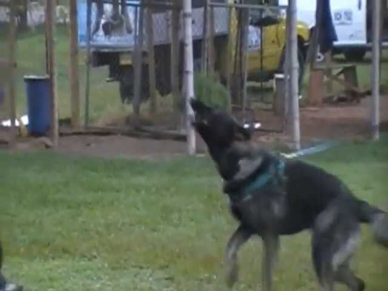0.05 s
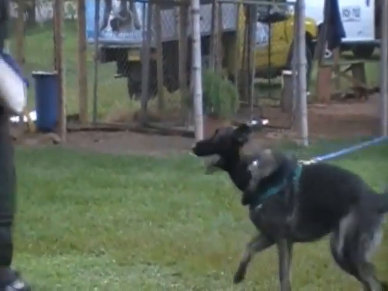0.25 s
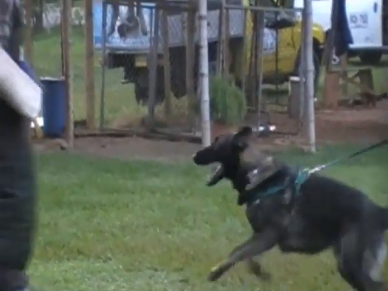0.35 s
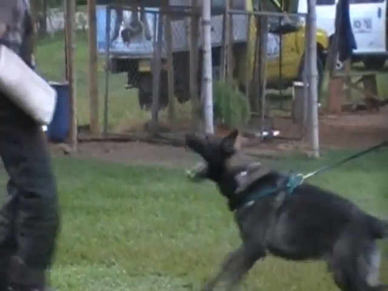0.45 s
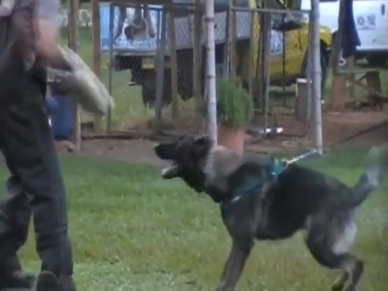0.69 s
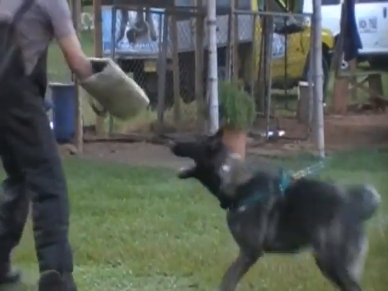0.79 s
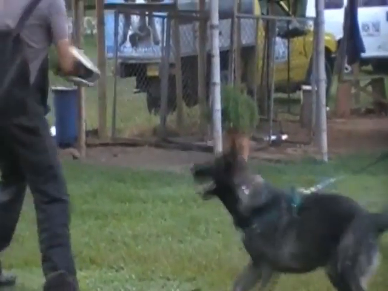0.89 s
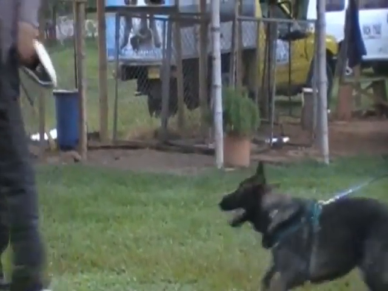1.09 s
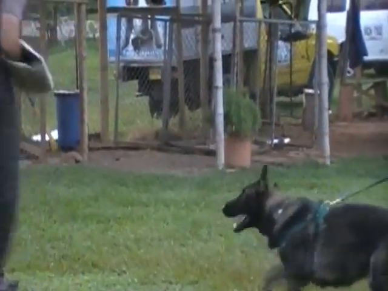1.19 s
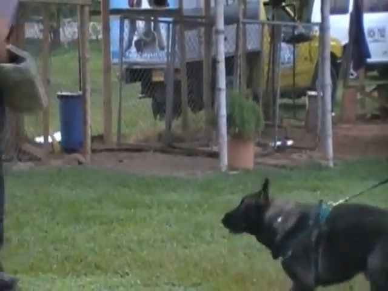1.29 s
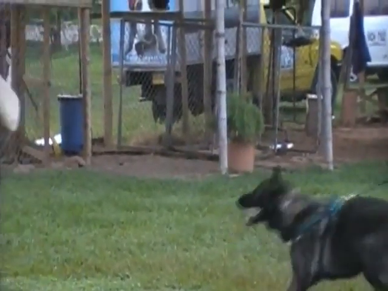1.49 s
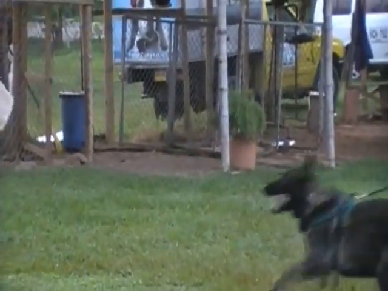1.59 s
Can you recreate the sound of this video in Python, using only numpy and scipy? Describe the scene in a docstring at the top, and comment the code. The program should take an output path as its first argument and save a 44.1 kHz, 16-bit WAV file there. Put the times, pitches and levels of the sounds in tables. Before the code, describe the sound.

A large dog barks twice, hard and close, with hoarser barks further back in a yard.

```python
"""Faint outdoor air and insect buzz, then two hard, close barks from a large tethered dog in a grassy yard.
Hoarser, more distant barks follow quickly, and something scuffs the ground between the last two.
Each bark is uneven vocal folds ringing the throat and mouth, with rasp and whistle past the teeth.
Sheds and fences throw the barks back, and a fast limiter holds the loudest ones down."""
import sys
import numpy as np
from scipy import signal
from scipy.fft import rfft, irfft
from scipy.io import wavfile
from scipy.ndimage import uniform_filter1d, minimum_filter1d

SR = 44100
rng = np.random.default_rng(int(sys.argv[2]) if len(sys.argv) > 2 else 0)


def inscribe(sig):
    """Save sig as 16-bit PCM at rate SR to the path in sys.argv[1].

    A 1-D sig is mono; a 2-D sig holds one channel per row.
    Samples are clipped to [-1, 1] before scaling.
    """
    pcm = np.round(np.clip(np.atleast_2d(sig).T, -1, 1) * 32767)
    wavfile.write(sys.argv[1], SR, pcm.astype(np.int16))


N = 72765
T = np.arange(N) / SR

# Colour of the outdoor bed. Each row: frequency in Hz, relative level in dB.
AIR_COLOUR = [(25, -24), (60, -11), (100, -19), (160, -4), (230, -5.5), (400, -2.5), (800, -4.5), (1250, 3),
              (1800, -7), (2800, -12), (4200, -14.5), (7000, -18.5), (10000, -19), (15000, -42)]
# Bark gestures, one list a bark. Each row: time in seconds, pitch in Hz, level in dB,
# roughness (capped at 1), brightness in dB per octave.
CLOSE_GESTURES = [
    [(.211, 488.2, -46, 0.14, -13), (.216, 505.3, -12.5, 0.08, -3.5), (.224, 549, -8.5, 0.18, 6.5),
     (.232, 652, 0, 0.16, 5), (.243, 572, -10, 1.23, -8), (.257, 573.3, -6.5, 0.65, -2),
     (.272, 578, -4.5, 0.6, 1), (.283, 595.4, -5, 0.2, -3), (.288, 578, -15.5, 0.3, -3),
     (.294, 450, -21.5, 0.14, 3)],
    [(.654, 332.9, -61, 0.33, -15), (.661, 431, -17, 0.5, -1), (.667, 581.6, 8, 0.12, -3),
     (.675, 617.3, 2, 0.22, 16), (.681, 794.2, 1.5, 0.13, 0), (.688, 780.4, 2, 0.77, 11.5),
     (.692, 398.8, -1, 0.48, 0.5), (.710, 424.2, -4, 0.65, 2.5), (.725, 423, -12.5, 0.73, -3.5),
     (.745, 388.7, -14.5, 0.5, 13.5), (.757, 413, -29, 0.88, -13)],
]
FAR_GESTURES = [
    [(.75, 426.7, -26, 0.37, 0), (.78, 546.1, -26.5, 0.16, 3.5), (.80, 611.8, -21, 1, -1),
     (.826, 677, -14, 0.13, -1), (.85, 591.9, -19, 0.42, -1), (.866, 446.5, -23, 0.42, 4),
     (.884, 312, -32.5, 0.54, -6.5)],
    [(1.135, 600, -36, 0.28, 9), (1.151, 742, -21.5, 0.29, -8), (1.175, 840.9, -17, 0.89, 0.5),
     (1.187, 799.4, -18.5, 1.1, -0.5), (1.196, 625.7, -15, 0.49, -1), (1.212, 627.6, -13, 0.07, -1.5),
     (1.225, 682.3, -17.5, 0.36, -2.5), (1.241, 631.3, -14.5, 0.2, -3), (1.256, 515, -19.5, 0.26, -7.5),
     (1.273, 389, -32.5, .4, -3.5)],
    [(1.63, 478, -41, 0.63, -1), (1.642, 622, -37.5, 0.77, 7.5), (1.65, 752, -21, 0.61, 1),
     (1.67, 786, -6, 0.2, 7)],
]
# Throat and mouth formants, one list a bark. Each row: centre in Hz, stage width in Hz, relative gain in dB.
CLOSE_FORMANTS = [
    [(369, 110, -18), (721, 91, -7), (1172, 336, 7), (1445, 260, -1.5), (1830, 155, 2), (2280, 250, -1)],
    [(401, 170, -19), (793, 150, -5.5), (1233, 305, 8.5), (1470, 227, 3.5), (2010, 234, -4),
     (2195, 180, -11.5)],
]
FAR_FORMANTS = [
    [(456, 290, -10.5), (672, 232, 6), (1110, 467, 9), (1444, 300, 9), (1895, 190, 8.5), (2490, 520, -1.5)],
    [(543, 250, -1.5), (676, 150, 2), (1074, 170, 12), (1504, 360, 11.5), (1990, 223, 9), (2600, 360, -0.5)],
    [(613, 600, -4), (1286, 400, -1), (1620, 440, 3.5)],
]
# Whistling overtones and rushing breath at the teeth. Each row: frequency in Hz, relative level in dB.
WHISTLE_COLOUR = [(1500, -36), (2800, -29), (3900, -18), (5000, -1.5), (6200, 6.5), (7600, 10.5),
                  (10000, -4), (12500, -18), (15500, -46)]
RASP_COLOUR = [(30, -2), (90, -7), (160, -22), (350, -12), (1500, -12), (2800, -12), (3800, -10), (4900, 8),
               (6200, 2), (7700, -4), (10000, -5.5), (12500, -13.5), (15500, -41)]
# Slaps off sheds and fences. Each row: delay in seconds, level in dB, pan in dB (positive is left).
CLOSE_SLAPS = [(.036, -29.5, 8), (.072, -32, -11), (.092, -23.5, -3), (0.117, -30.5, -2), (0.264, -44, -4)]
FAR_SLAPS = [(.022, -9, 5.5), (.055, -9.5, -5), (.098, -13, -5), (.122, -22, 4), (.2, -22.5, -2)]
# Colour of the yard's diffuse tail. Each row: frequency in Hz, relative level in dB.
TAIL_COLOUR = [(150, -11), (400, 2.5), (650, 11), (900, -10.5), (1250, -6.5), (2200, 3.5), (5000, 17.5),
               (12000, 10.5)]
# Length of that tail. Each row: frequency in Hz, seconds to fall by 60 dB.
TAIL_DECAY = [(200, 0.42), (1200, 2.41), (2500, 0.82), (6000, 0.44), (12000, 0.7)]
# Envelope of the scuff. Each row: time in seconds, level in dB.
SCUFF_ENVELOPE = [(1.35, -60), (1.38, -38.5), (1.414, -44), (1.468, -32.5), (1.501, -40), (1.562, -45)]
# Colour of the scuff. Each row: frequency in Hz, relative level in dB.
SCUFF_COLOUR = [(100, 1), (500, 7.5), (1300, 19), (2300, 9.5), (3200, 8.5), (4100, -5.5), (6000, 2.5),
                (9000, -3.5), (15000, -22)]


def from_db(db):
    """Decibels to gain."""
    return 10 ** (np.asarray(db) / 20)


def unit_rms(x):
    """Scale to unit rms."""
    return x / np.sqrt(np.mean(x ** 2) + 1e-20)


def at_hz(curve, hz):
    """Read a curve on a log-frequency axis."""
    freqs, values = np.transpose(curve)
    return np.interp(np.log(np.maximum(hz, 1)), np.log(freqs), values)


def pan(db):
    """Stereo gains that put the left this many dB above the right."""
    return from_db(np.array([[db], [-db]]) / 2)


def noise(colour, side_db):
    """Stereo noise of a given colour and width, at unit rms."""
    gains = from_db(at_hz(colour, np.arange(N + 1) * SR / (2 * N)))
    mid, side = irfft(rfft(rng.standard_normal((2, 2 * N))) * gains)[:, :N]
    return unit_rms(mid + from_db(side_db) * side * np.array([[1], [-1]]))


def wander(rate_hz):
    """Smooth random modulation at unit rms."""
    return unit_rms(signal.sosfilt(signal.butter(2, rate_hz, fs=SR, output="sos"), rng.standard_normal(N)))


def resonate(x, hz, width_hz):
    """A steep-sided resonance: two equal stages."""
    radius = np.exp(-np.pi * width_hz / SR)
    b = (1 - radius ** 2) / 2 * np.array([1, 0, -1])
    a = [1, -2 * radius * np.cos(2 * np.pi * hz / SR), radius ** 2]
    return signal.lfilter(b, a, signal.lfilter(b, a, x))


def air():
    """A soft, steady bed of outdoor air."""
    return from_db(-46) * noise(AIR_COLOUR, side_db=-8) * pan(-1.8)


def insects():
    """Insects buzz as one thin, high band of noise."""
    return from_db(-54) * unit_rms(resonate(noise(AIR_COLOUR, side_db=-8), hz=5373, width_hz=410))


def bark(gesture, formants, rasp_db, whistle_db, teeth_follow, jitter, turbulence):
    """Vocal folds flap unevenly and chop the airflow; the throat shapes it, the teeth whistle and rasp."""
    times, *curves = np.transpose(gesture)
    hz, level_db, roughness, brightness = (np.interp(T, times, curve) for curve in curves)
    roughness = np.clip(roughness, 0, 1)
    attack_db = 6011 * np.maximum(times[0] - T, 0)  # fades either side of the gesture, in dB per second
    release_db = 1805 * np.maximum(T - times[-1], 0)
    level_db = np.maximum(level_db - attack_db - release_db, -200)

    phase = 2 * np.pi * np.cumsum(hz * (1 + jitter * roughness * wander(rate_hz=220))) / SR
    folds = unit_rms(sum(np.cos(k * phase) / k for k in range(1, 11)))
    subharmonic = np.cos(phase / 3)
    growl = 1 + roughness * (0.65 * wander(rate_hz=220) + 0.75 * subharmonic)
    opening = unit_rms(1.32 + np.cos(phase))  # air passes in puffs as the folds part
    breath = turbulence * roughness * opening * wander(rate_hz=1920)
    source = folds * growl + breath
    voice = sum(from_db(db + brightness * np.log2(centre / 1000)) * resonate(source, centre, width)
                for centre, width, db in formants)
    voice /= np.sqrt(uniform_filter1d(voice ** 2, size=350) + 1e-9)  # flatten, so the gesture sets the level

    overtones = sum(from_db(at_hz(WHISTLE_COLOUR, k * hz)) * np.cos(k * phase + rng.uniform(0, 2 * np.pi))
                    for k in range(4, 30))
    whistle = from_db(whistle_db) * unit_rms(growl * overtones)
    rasp_gain = from_db(rasp_db + 3.2 * wander(rate_hz=90)) * np.sqrt(opening)
    rasp = rasp_gain * noise(RASP_COLOUR, side_db=-21)
    return from_db(level_db) * voice + from_db(teeth_follow * level_db) * (rasp + whistle)


def yard(bark_sound, slaps, tail_db, treble_db, build_s, side_db, pan_db):
    """Sheds and fences return dull slaps, and a diffuse tail hangs longest in the mids."""
    mono = bark_sound.mean(axis=0)
    dull = signal.sosfilt(signal.butter(1, 7000, fs=SR, output="sos"), mono)
    echoes = sum(from_db(db) * pan(side) * np.interp(T - delay, T, dull, left=0) for delay, db, side in slaps)
    white = noise([(20, 0), (20000, 0)], side_db)
    edges_hz = np.geomspace(100, 16000, 12)
    tail = 0
    for low, high in zip(edges_hz, edges_hz[1:]):
        hz = np.sqrt(low * high)
        band = signal.sosfiltfilt(signal.butter(2, [low, high], "band", fs=SR, output="sos"), white)
        band_db = at_hz(TAIL_COLOUR, hz) + at_hz([(1200, 0.0098), (4500, treble_db)], hz)
        tail += band * from_db(band_db - 60 * T / at_hz(TAIL_DECAY, hz))
    bloom = 1 - np.exp(-(T / build_s) ** 2)
    tail *= bloom * from_db(tail_db) / np.sqrt(SR)
    return echoes + pan(pan_db) * signal.fftconvolve(mono[None], tail, axes=1)[:, :N]


def close_barks():
    """Two hard, open-mouthed barks up front, mostly direct sound."""
    direct = sum(bark(gesture, formants, rasp_db=-35, whistle_db=-34.5, teeth_follow=0.63,
                      jitter=0.045, turbulence=1.25)
                 for gesture, formants in zip(CLOSE_GESTURES, CLOSE_FORMANTS))
    wet = yard(direct, CLOSE_SLAPS, tail_db=-12, treble_db=6.5, build_s=0.034, side_db=-7, pan_db=-0.5)
    return pan(-2.3) * direct + wet


def far_barks():
    """Hoarser barks further back, with more yard on them; the third is just starting at the end."""
    direct = sum(bark(gesture, formants, rasp_db=-21, whistle_db=-21, teeth_follow=1.278,
                      jitter=0.03, turbulence=1.1)
                 for gesture, formants in zip(FAR_GESTURES, FAR_FORMANTS))
    wet = yard(direct, FAR_SLAPS, tail_db=-8, treble_db=0, build_s=0.0018, side_db=-5.5, pan_db=-4)
    return pan(-5) * direct + wet


def scuff():
    """Something scuffs the ground: two quick swells of grainy midrange noise."""
    times, db = np.transpose(SCUFF_ENVELOPE)
    level_db = np.interp(T, times, db, left=-120, right=-120)
    grain_db = 1.2 * wander(rate_hz=200)
    return from_db(level_db + grain_db) * noise(SCUFF_COLOUR, side_db=-17.5)


def scene():
    """The barks on top, the quiet yard and the scuff underneath."""
    return close_barks() + far_barks() + air() + insects() + scuff()


def limiter(x, ceiling_db, release_db_per_s):
    """Ducks the gain just ahead of loud peaks and lets it back quickly."""
    over_db = np.maximum(20 * np.log10(np.abs(x).max(axis=0) + 1e-9) - ceiling_db, 0)
    held_db = np.maximum.accumulate(over_db + release_db_per_s * T) - release_db_per_s * T
    gain_db = uniform_filter1d(minimum_filter1d(-held_db, size=200), size=200)
    return x * from_db(gain_db)


def record(dry):
    """The recorder's limiter thumps faintly as its gain moves a small DC offset; then low and high cuts."""
    offset = from_db(-34.5)
    limited = limiter(dry + offset, ceiling_db=-0.5, release_db_per_s=248)
    centred = limited - limited[:, :N // 10].mean()
    low_cut = signal.sosfilt(signal.butter(1, 25, "high", fs=SR, output="sos"), centred)
    return signal.sosfilt(signal.cheby2(12, 70, 15700, fs=SR, output="sos"), low_cut)


dry = scene()
out = record(dry)
inscribe(out)
```